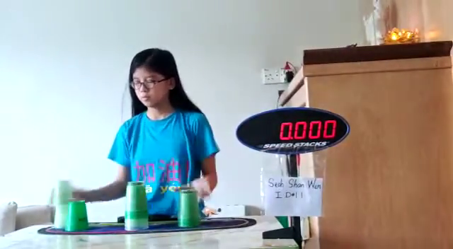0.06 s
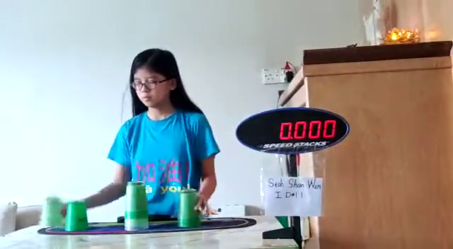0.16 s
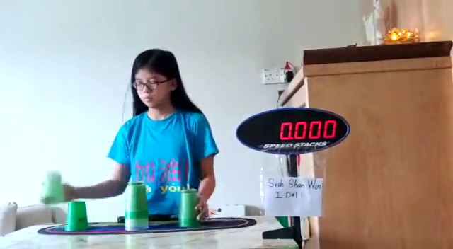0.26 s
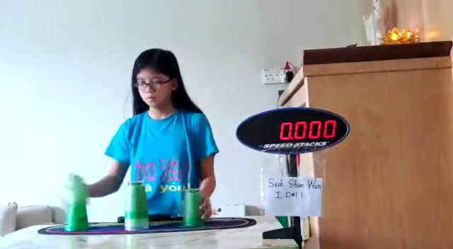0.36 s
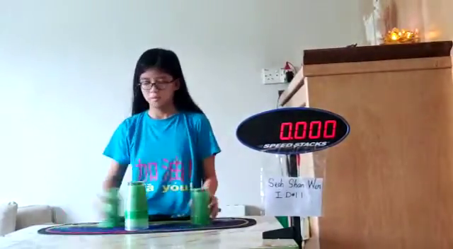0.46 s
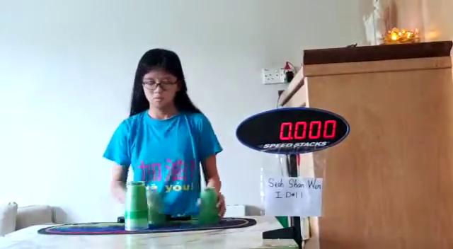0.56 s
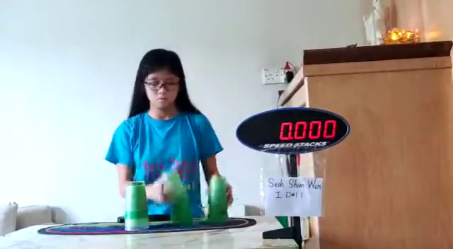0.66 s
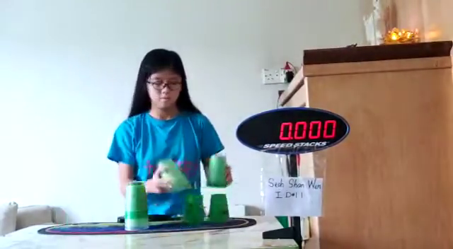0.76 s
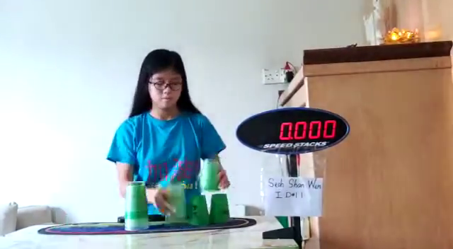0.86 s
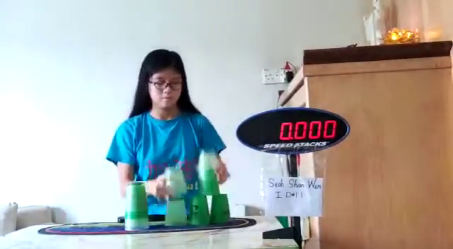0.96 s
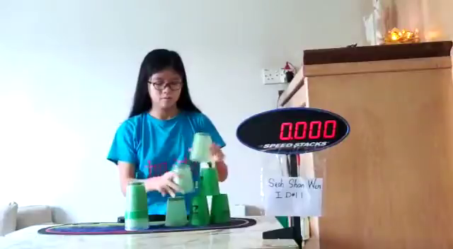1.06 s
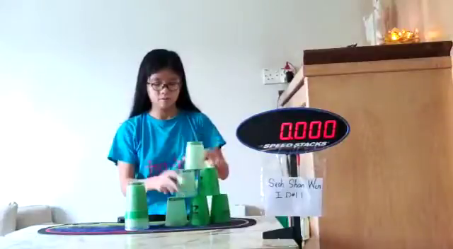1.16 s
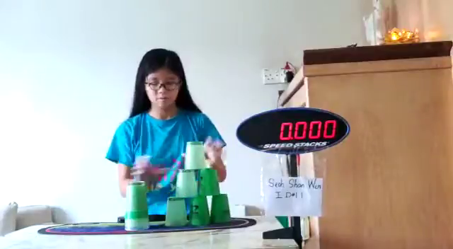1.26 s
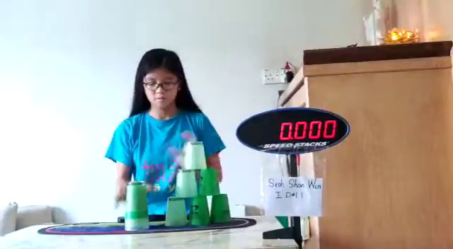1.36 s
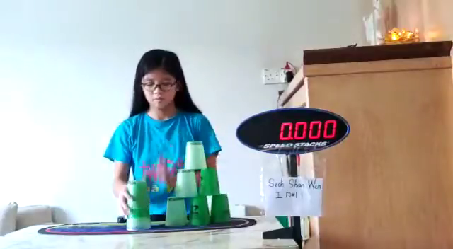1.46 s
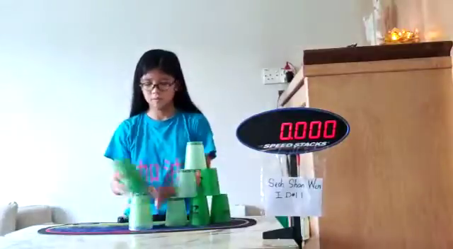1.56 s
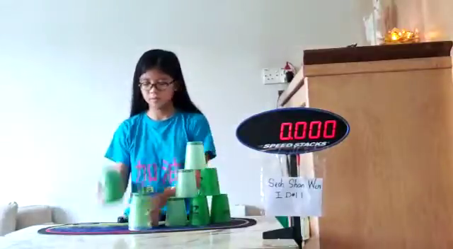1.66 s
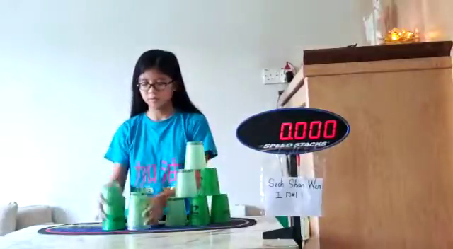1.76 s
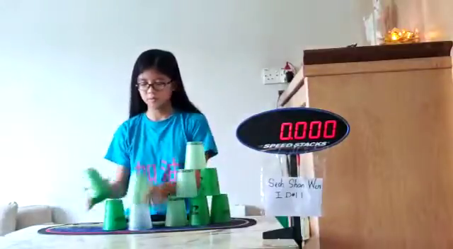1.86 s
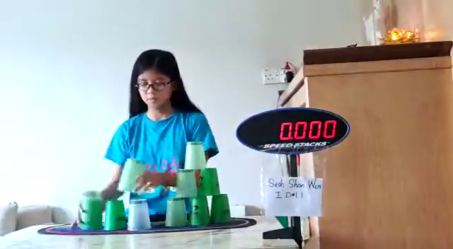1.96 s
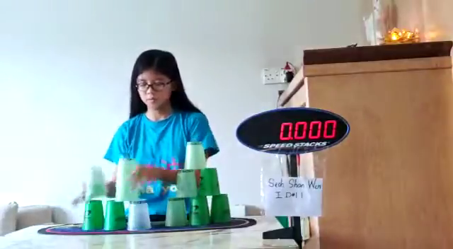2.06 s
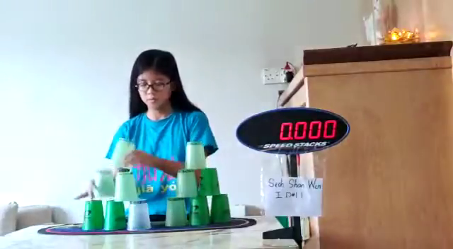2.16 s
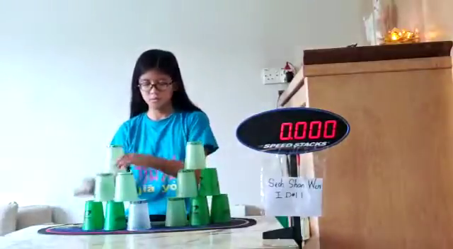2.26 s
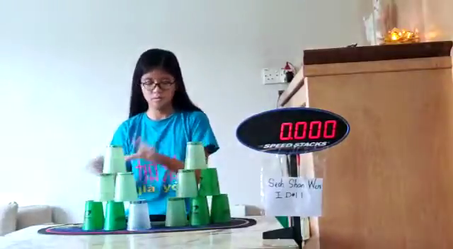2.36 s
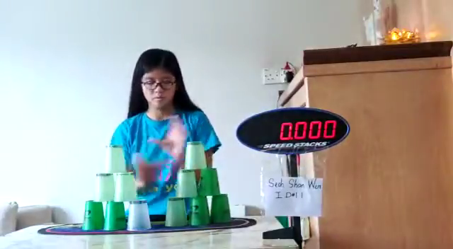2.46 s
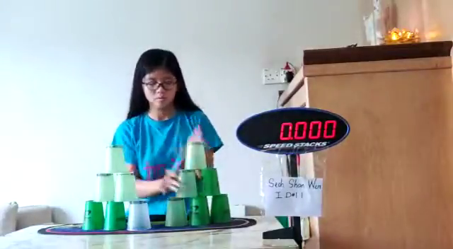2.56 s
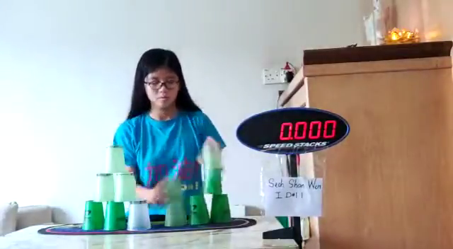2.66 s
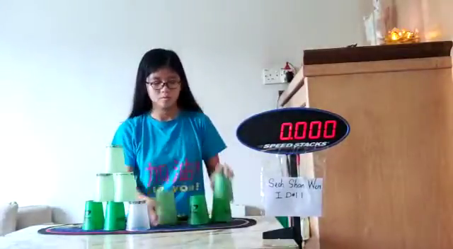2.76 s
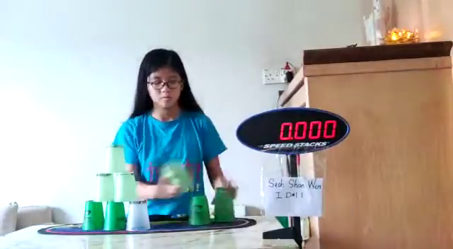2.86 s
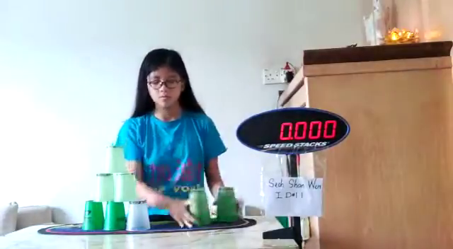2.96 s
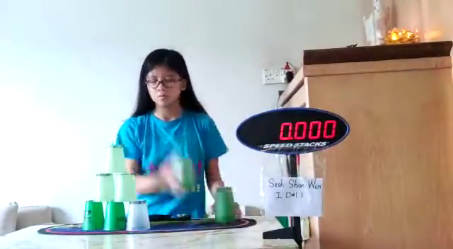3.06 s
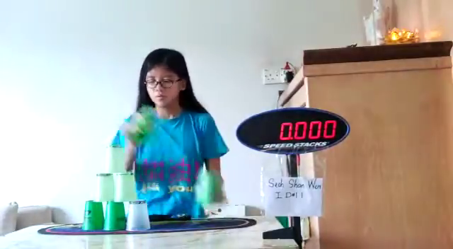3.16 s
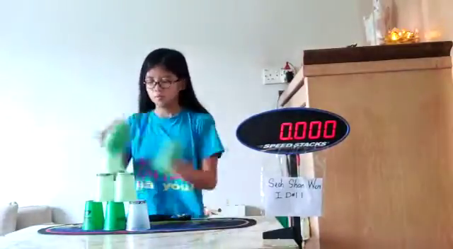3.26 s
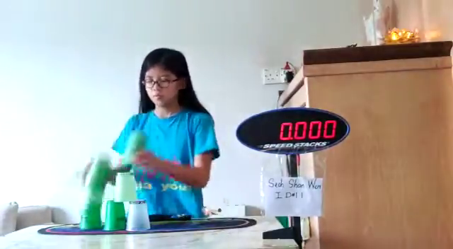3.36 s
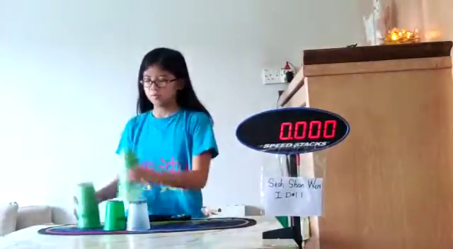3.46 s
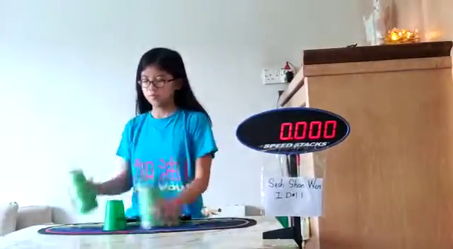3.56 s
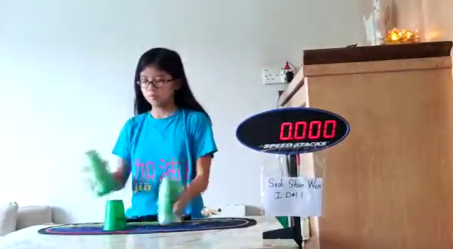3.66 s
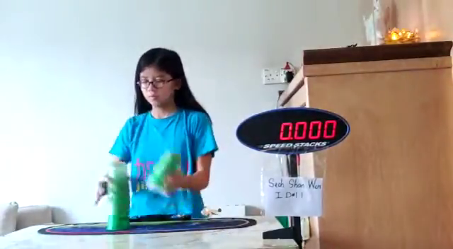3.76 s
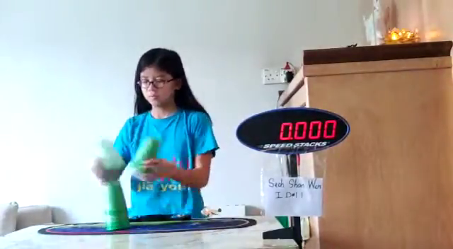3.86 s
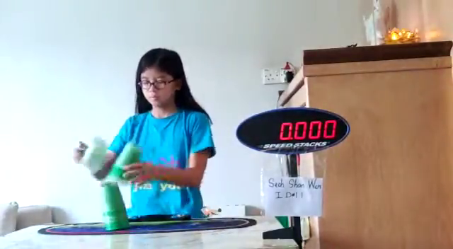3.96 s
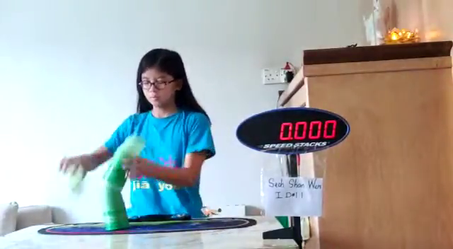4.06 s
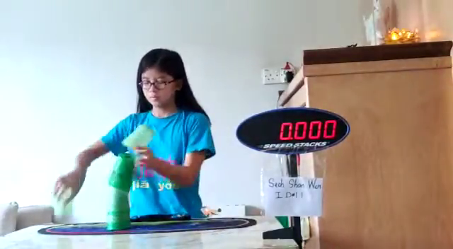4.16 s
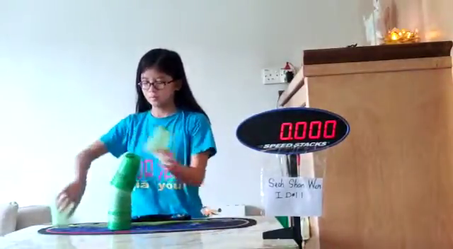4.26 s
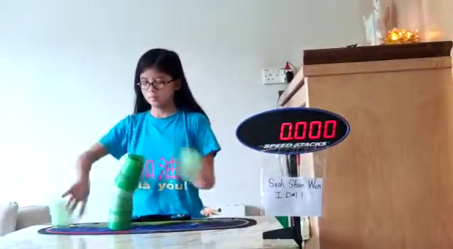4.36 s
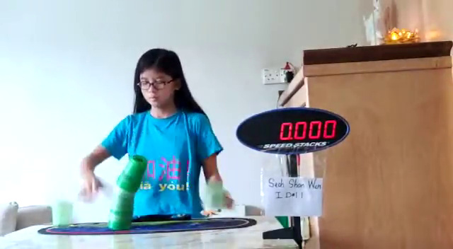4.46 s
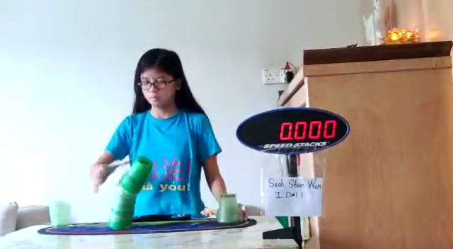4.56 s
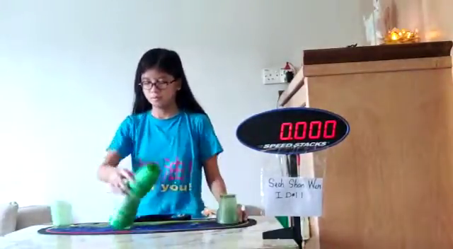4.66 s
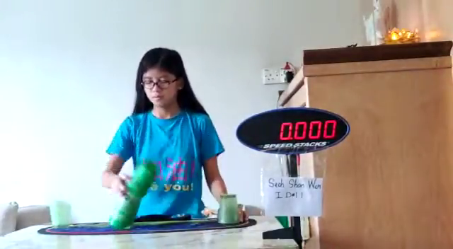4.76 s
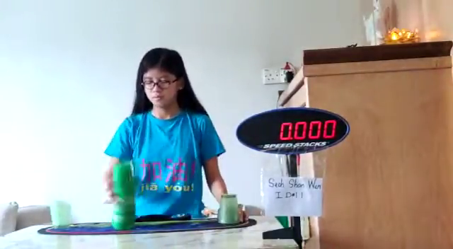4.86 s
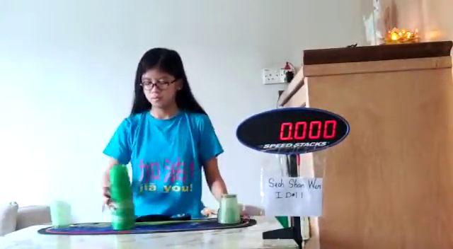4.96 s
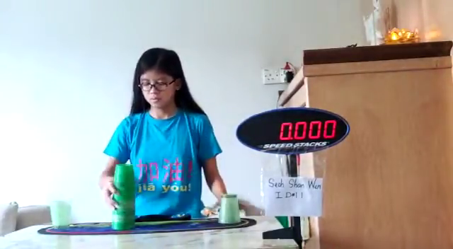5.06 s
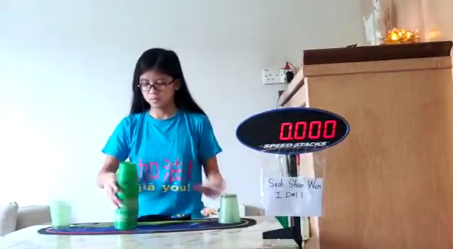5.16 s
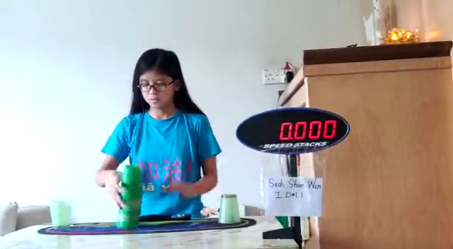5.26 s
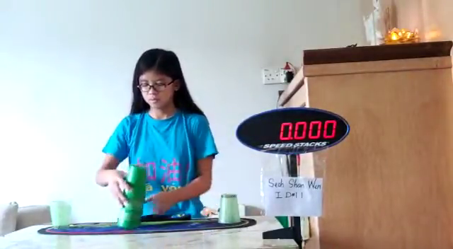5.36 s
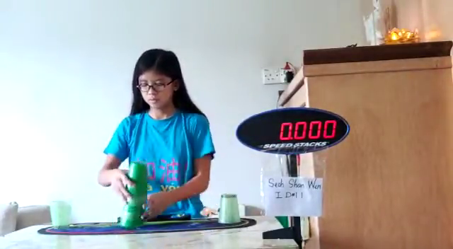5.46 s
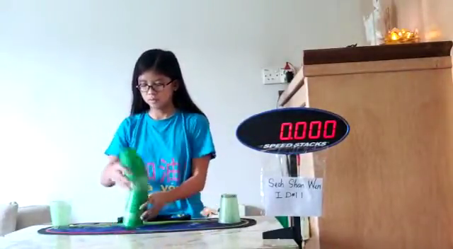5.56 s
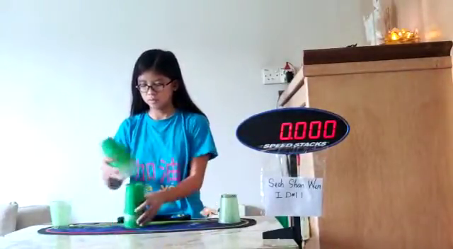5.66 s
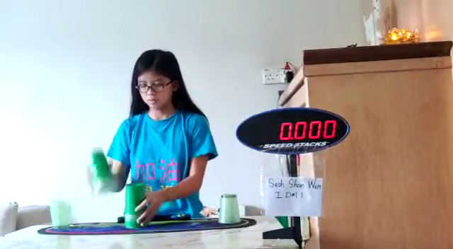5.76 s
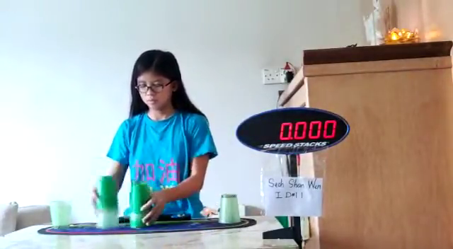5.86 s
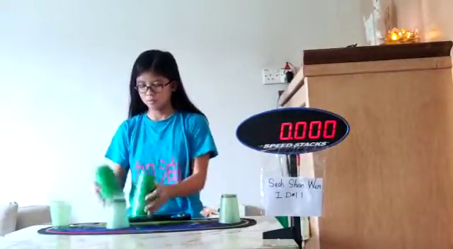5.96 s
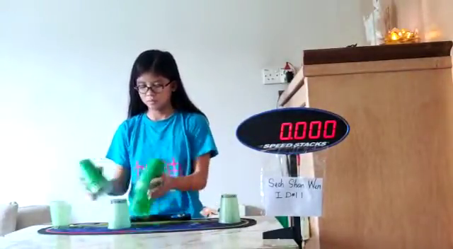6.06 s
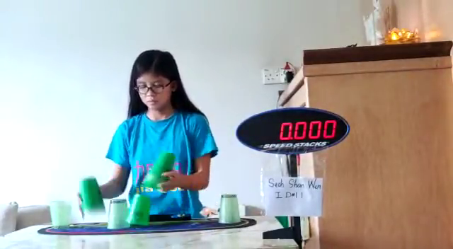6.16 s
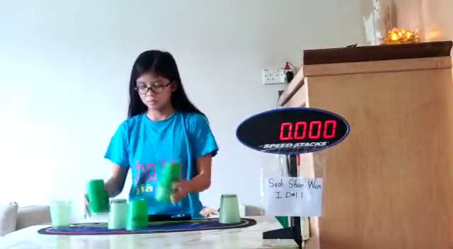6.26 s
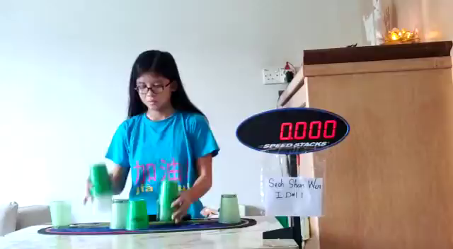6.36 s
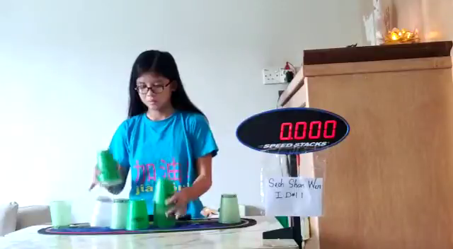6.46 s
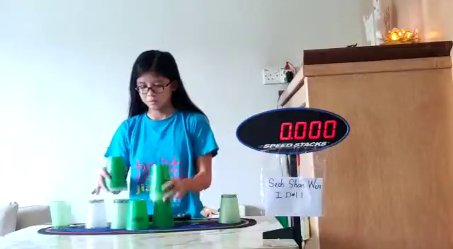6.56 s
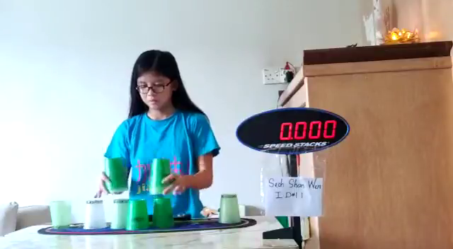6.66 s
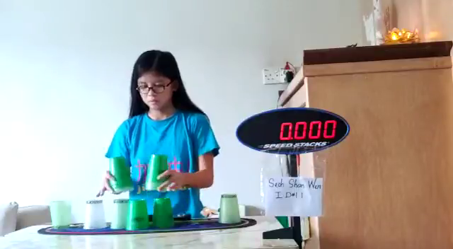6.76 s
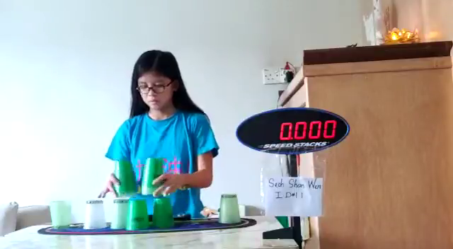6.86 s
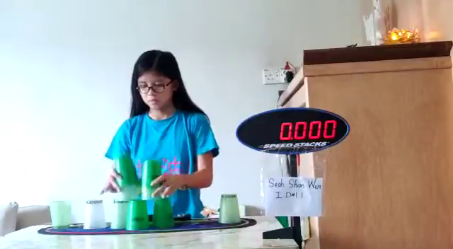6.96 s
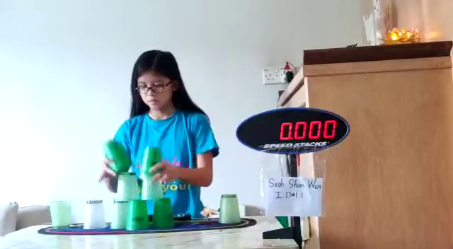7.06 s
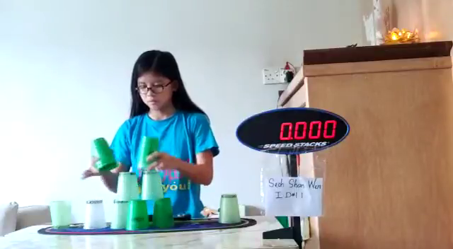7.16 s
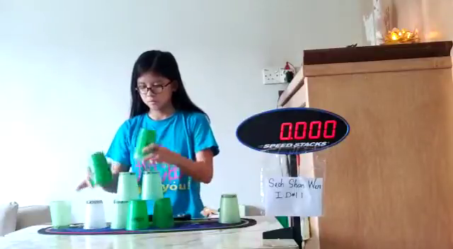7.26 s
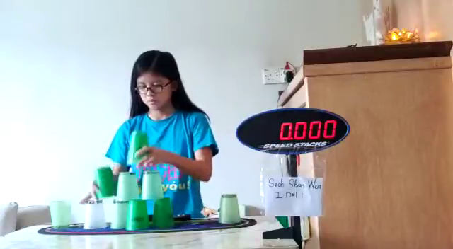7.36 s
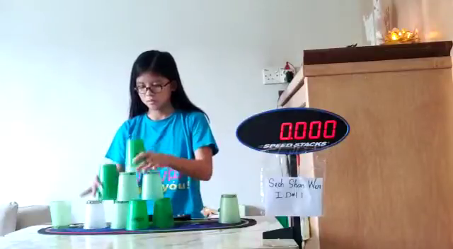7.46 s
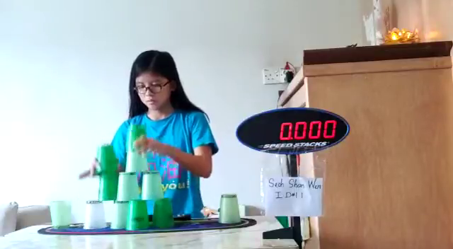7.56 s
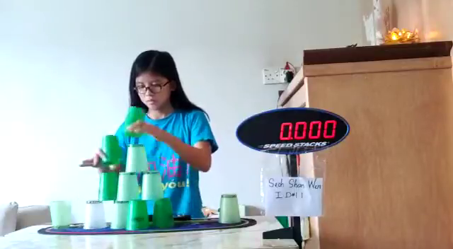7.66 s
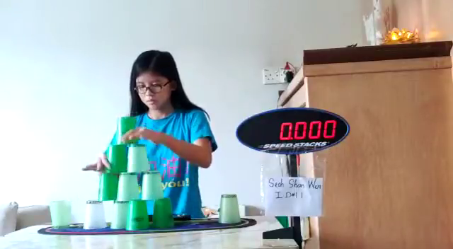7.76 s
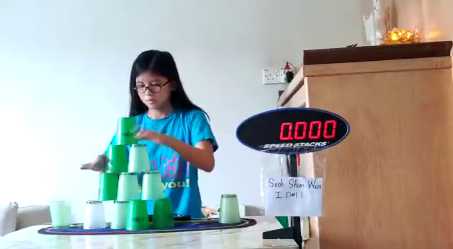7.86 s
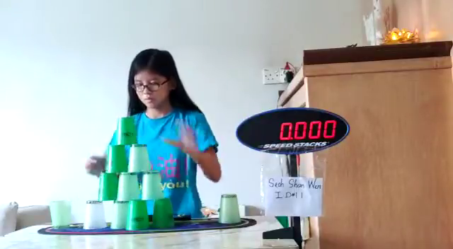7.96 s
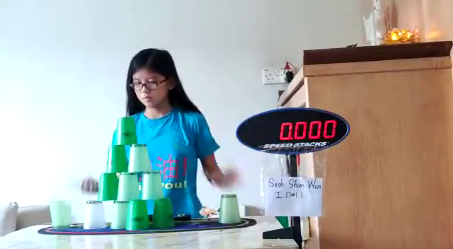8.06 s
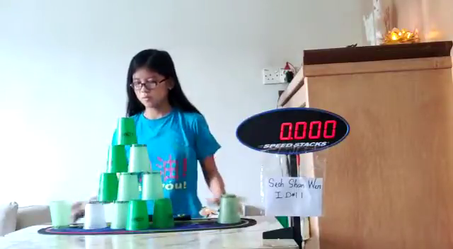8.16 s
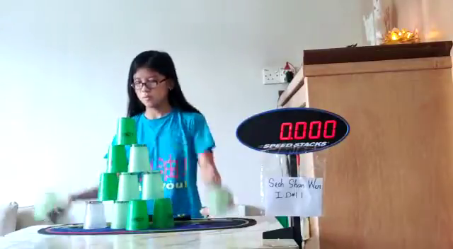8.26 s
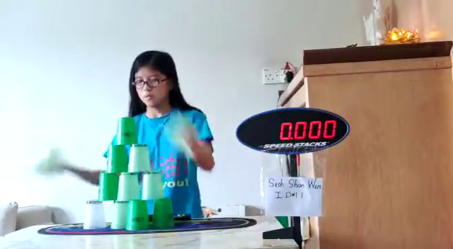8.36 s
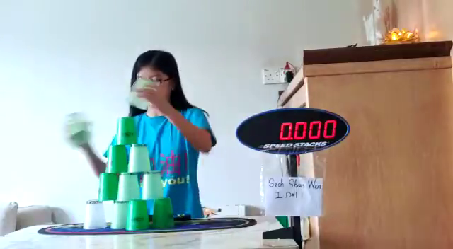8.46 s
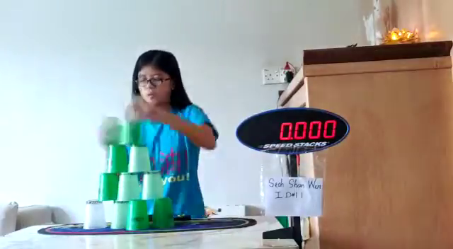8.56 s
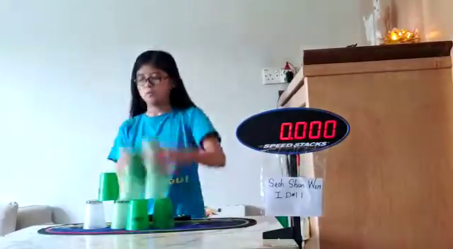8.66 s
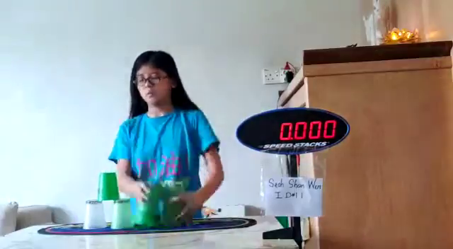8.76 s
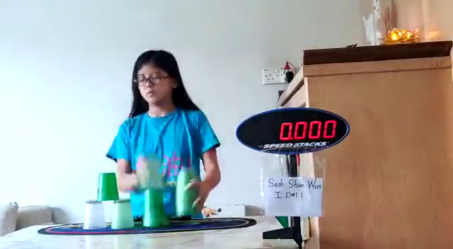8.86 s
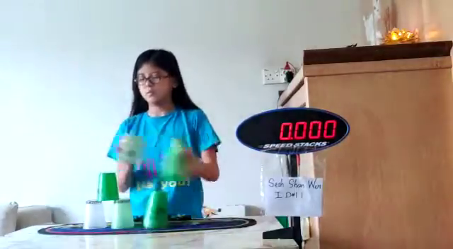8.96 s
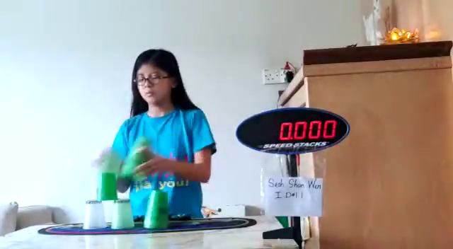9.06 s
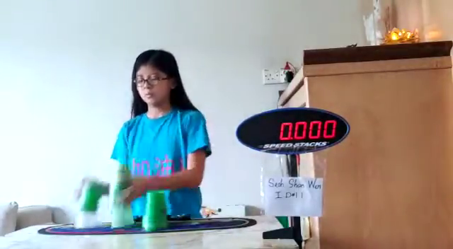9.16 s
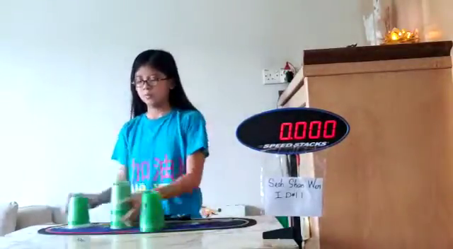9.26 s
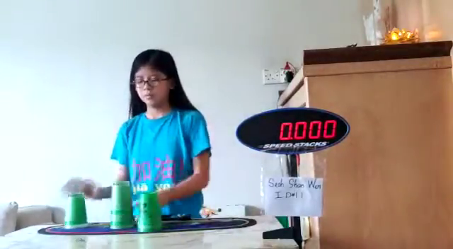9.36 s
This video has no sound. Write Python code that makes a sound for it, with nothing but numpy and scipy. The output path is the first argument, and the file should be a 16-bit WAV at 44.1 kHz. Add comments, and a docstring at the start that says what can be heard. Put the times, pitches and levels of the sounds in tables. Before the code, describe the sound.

Close by, plastic cups knock, pop and click as hands build pyramids and nest them again. Landings on the mat are dull and low, plastic on plastic is brighter and drier. A busy run of clacks comes first, then quieter handling with faint rubbing, more stacking, and a strong rasping collapse at the end. Short live room echo, dull murmur underneath, stereo pickup.

```python
"""Plastic cups are stacked into pyramids and swept down again on a mat on a table, in a small bare room.
Each landing is a set of filtered impulses: table thump, air resonance in the cup, wall modes and rim click.
Cups knocking into or against a stack add a dry crack; fine hisses are made of many tiny random slips.
A few faint squeaks are rising tones, dull bumps are bass resonances, and coloured noise is the room's murmur."""
import sys
import numpy as np
from scipy import signal
from scipy.fft import rfft, irfft
from scipy.io import wavfile
from scipy.ndimage import uniform_filter1d

SR = 44100
rng = np.random.default_rng(int(sys.argv[2]) if len(sys.argv) > 2 else 0)


def generate_wav(sig):
    """Save sig (samples, or channels by samples) to the path in sys.argv[1] as 16-bit PCM at SR."""
    pcm = np.round(np.clip(np.atleast_2d(sig).T, -1, 1) * 32767).astype(np.int16)
    wavfile.write(sys.argv[1], SR, pcm)


N = 415422  # samples in the scene

# Hissing sounds: cups sliding in or out of a stack, and two long, faint stretches of hiss.
# Each row: start in seconds, end in seconds, relative hiss level in dB.
HISSES = [(-.08, 0.11, -58.5), (0.166, 0.225, -53), (0.501, 0.576, -61), (0.74, 0.84, -64.5),
          (1.496, 1.588, -63.5), (1.658, 1.814, -69.5), (1.893, 2.08, -59.5), (2.404, 2.508, -60.5),
          (2.715, 2.821, -46.5), (2.832, 2.878, -41), (3.385, 3.53, -42.5), (3.781, 3.865, -55.5),
          (4.078, 4.184, -54), (4.262, 4.57, -63.5), (4.531, 5.025, -72), (5.397, 5.698, -68),
          (6.123, 6.232, -65), (6.337, 6.66, -77), (7.022, 7.081, -61), (7.14, 7.22, -65),
          (7.867, 7.899, -49), (8.249, 8.369, -70), (8.654, 8.833, -39.5), (9.17, 9.203, -45.5),
          (9.276, 9.34, -45)]
# Rims touching lightly. Each row: time in seconds, relative level in dB.
TOUCHES = [(0.1795, -27.5), (.491, -31.5), (0.649, -46), (1.017, -34.5), (1.5011, -33), (1.862, -31.5),
           (1.9716, -35.5), (2.6996, -39), (2.7813, -26), (3.3738, -32.5), (4.036, -27), (4.292, -43.5),
           (5.677, -47.5), (5.997, -33.5), (6.025, -42), (6.5923, -43)]
# Cups knocking into or against a stack. Each row: time in seconds, relative hollow pop level in dB,
# cup air pitch in Hz, relative knock level in dB, knock pitch in Hz, relative crack level in dB.
KNOCKS = [(.251, -15.5, 370, -38, 1920, -32.5), (2.142, -13.5, 603, -47, 1140, -42),
          (2.816, -10, 417, -37, 2060, -33.5), (2.944, -22.5, 413, -39, 1860, -42),
          (3.066, -9, 369, -32.5, 1880, -32.5), (3.519, -19, 740, -50, 1430, -29.5),
          (3.536, -12.5, 766, -32.5, 1370, -47), (3.672, -6.5, 399, -30.5, 1620, -27.5),
          (3.903, -11, 597, -29, 1530, -36), (4.044, -28.5, 510, -45, 1970, -50),
          (4.109, -27.5, 740, -48.5, 1484, -48.5), (5.004, -26.5, 575, -51.5, 1500, -58.5),
          (5.342, -33.5, 590, -55.5, 1510, -66.5), (5.378, -33.5, 575, -52, 1480, -54),
          (7.058, -23.5, 550, -54, 1730, -56), (8.729, -31, 503.6, -39.5, 1985, -34.5),
          (8.758, -19.5, 404, -36.5, 1950, -39), (8.8485, -8, 422, -26, 1525, -24),
          (9.32, -23, 497, -39.5, 1810, -42), (9.34, -13, 805, -43, 1290, -51)]
# Cups set down on the mat or on each other. Each row: time in seconds, relative hollow pop level in dB,
# cup air pitch in Hz, hardness from 0 (flat on the mat) to 1 (plastic on plastic).
LANDINGS = [(.475, -14, 572, .44), (.6, -20, 400, 0.52), (1.011, -9.5, 422, 0.7), (1.21, -22, 397, 0.82),
            (1.242, -13.5, 438, 0.79), (1.85, -18, 396.5, .17), (2.077, -12.5, 382, 0.55),
            (2.296, -11, 602, .61), (2.357, -15.5, 566, .77), (2.679, -26.5, 374, .56),
            (3.016, -6.5, 400, 0.68), (3.357, -27, 590, .88), (3.4, -25, 610, .88),
            (3.463, -21.5, 636, .77), (3.829, -21, 535, .54), (4.361, -35, 385, .34),
            (4.642, -23.5, 435, .18), (4.734, -35, 359, .26), (5.987, -14.5, 440, 0.17),
            (6.242, -23.5, 368, .1), (6.335, -18.5, 353, .06), (6.534, -25.5, 373, .4),
            (6.567, -21.5, 363, .32), (6.627, -26, 394, .09), (6.701, -31, 376, .05),
            (6.994, -17.5, 677, 0.68), (7.482, -22.5, 527, .66), (7.521, -10, 579, .72),
            (7.862, -12.5, 622, 0.84), (8.307, -36, 371, .25), (8.647, -15, 564, 0.77),
            (8.709, -19.5, 557, .97), (8.816, -5, 588, .7), (9.165, -24.5, 397, .82), (9.249, -6, 569, .66)]
# Runs of dull bumps as the hands shift a stack. Each row: start in seconds, end in seconds, level in dB.
BUMPS = [(1.935, 1.97, -40), (5.179, 5.4, -46.5), (5.453, 5.78, -50)]
# Faint squeaks of a stack turned in the hand. Each row: start in seconds, length in seconds, relative level in dB.
SQUEAKS = [(3.268, 0.11, -64), (4.43, 0.22, -79), (4.675, .19, -73.5)]

# Thin cup wall damped by the fingers. Each row: mode in Hz before detuning, relative gain in dB, width in Hz.
WALL_MODES = [(972, 16, 92), (1320, 2, 990), (1670, -16, 600), (1962, -8, 87), (2150, -21.5, 190),
              (3000, -8, 240)]
# Standing waves of the room. Each row: frequency in Hz, level over the direct sound in dB, width in Hz.
ROOM_MODES = [(119.4, 21.5, 7.3), (187.6, 22, 5.3), (242.6, 17.5, 4.4), (372.4, 17.5, 5.7),
              (408.3, 10.5, 6), (575, 13.5, 38), (726, 7, 44)]
# Echoes from table, wall and cabinet. Each row: mean delay in seconds, level against the direct sound in dB.
ECHOES = [(.0031, -2), (.0062, -10), (.0092, -18.5), (0.011, -2), (0.0134, -2.5), (0.016, -15.5),
          (.0222, -8), (0.0346, -9.5)]
# Reverberation time of the room. Each row: frequency in Hz, time to fall by 60 dB in seconds.
ROOM_T60 = [(100, 0.95), (260, 0.41), (700, 0.45), (1800, 0.45), (4800, 0.44), (7800, 0.39)]
# Strength of the diffuse tail. Each row: frequency in Hz, level over the direct sound in dB.
ROOM_TAIL = [(100, 8.5), (500, 13.5), (1000, 11), (2000, 10.5), (7000, 8.5)]
# Likeness of diffuse sound at the two microphones. Each row: frequency in Hz, left-right correlation.
ALIKE = [(100, 0.85), (300, .95), (550, 0.73), (900, 0.27), (1500, 0), (3000, 0.055), (8000, 0)]
# Stereo balance. Each row: frequency in Hz, left minus right in dB.
BALANCE = [(100, -0.5), (1200, -1.4), (2500, -0.5), (4500, 0.5), (6000, 4), (7000, 7), (7800, -1.5)]

# Spectrum of the table thump. Each row: frequency in Hz, relative gain in dB.
THUMP = [(25, -20.5), (50, -19.5), (85, -8), (120, -1.5), (200, 0), (300, -2), (450, -29.5), (900, -45.5),
         (2000, -94)]
# Spectrum of the hollow pop. Each row: frequency in Hz, relative gain in dB.
POP = [(60, -43.5), (200, -17.5), (350, 4.5), (550, 2.5), (750, 3.5), (900, -7.5), (1100, -15.5),
       (1400, -24.5), (2500, -42.5), (6000, -83)]
# Spectrum of the rim click. Each row: frequency in Hz, relative gain in dB.
RIM = [(300, -18), (1000, -6), (2000, -6.5), (2700, -6), (3300, -4), (3900, -5), (5000, -2), (6000, 0),
       (7000, 6.5), (7900, -5)]
# Spectrum of the hiss. Each row: frequency in Hz, relative gain in dB.
HISS = [(300, -21.5), (1000, -16.5), (2000, -10.5), (2800, -15), (3300, -11), (4000, -14), (5200, -9.5),
        (6200, -2), (7000, 2), (7900, -8.5)]
# Spectrum of the room murmur. Each row: frequency in Hz, relative gain in dB.
MURMUR = [(20, -12), (45, -26.5), (75, -4.5), (100, -11.5), (122, 4), (150, -5.5), (185, 4), (260, -2.5),
          (450, -7), (750, -6.5), (1000, -17), (1300, -28.5), (1900, -50), (2600, -59), (8000, -56.5)]

MURMUR_DB = -49  # RMS level against full scale
EDGE_HZ = 7980  # upper edge of the band
RING = 32768  # samples allotted to each sound
HZ, AGE = np.fft.rfftfreq(RING, 1 / SR), np.arange(RING) / SR  # frequency axis in Hz, time axis in s
FADE = np.minimum(10 * (1 - AGE / AGE[-1]), 1) ** 2  # every sound has died away by the end of its span

# How a landing divides its force: dB over the pop on the bare mat, dB added at hardness 1
THUMP_SOFT_DB, THUMP_HARD_DB = -5, -17
CLACK_SOFT_DB, CLACK_HARD_DB = -59, 49.1
CLICK_SOFT_DB, CLICK_HARD_DB = -48, 30.7
# The thump grows more slowly than the pop: dB lost for each dB of pop above a medium landing
MEDIUM_POP_DB, THUMP_LAG = -18, 0.22
WALL_HZ = 1170  # wall mode that a cup stirs when it lands on its rim
KNOCK_THUMP_DB, KNOCK_CLACK_DB, KNOCK_CLICK_DB = -10, 6, 1.5  # over the pop, the knock and the crack
KNOCK_WIDTH_HZ = 330
KNOCK_UPPER_HZ, GRIP_DETUNE = 3285, 0.042  # higher wall mode of a knock; largest share by which the grip shifts it
BUMP_GAP_S = .09
SQUEAK_HZ, SQUEAK_RISE_HZ_PER_S = 2310, 880  # the pitch climbs as the cups wedge tighter


def gain_of(db):
    """Level definition: 20 dB is a tenfold amplitude."""
    return 10 ** (np.asarray(db) / 20)


def rms(x):
    """Effective value: root of the mean square, kept above zero."""
    return np.sqrt(np.mean(x ** 2) + 1e-20)


def read(points, hz):
    """Linear interpolation on a logarithmic frequency axis."""
    f, value = np.transpose(points)
    return np.interp(np.log(hz + 1), np.log(f + 1), value)


def add(mix, s, sound):
    """Superposition: a stereo sound is summed into the mix from time s, cut off at both ends of the mix."""
    at = round(s * SR)
    part = mix[:, max(at, 0):][:, :RING + min(at, 0)]
    sound = sound[:, max(-at, 0):]
    part += sound[:, :part.shape[1]]


def colour(points):
    """Minimum phase: the Hilbert transform of the log gain supplies the phase of a causal filter."""
    log_gain = np.log(gain_of(read(points, HZ)))
    both_sides = np.r_[log_gain, log_gain[-2:0:-1]]
    return np.exp(np.conj(signal.hilbert(both_sides)))[:len(HZ)]


def resonance(hz, width_hz):
    """Damped oscillator: a band-pass of gain 1 at its centre."""
    damping = 1j * HZ * width_hz
    return damping / (hz ** 2 - HZ ** 2 + damping)


def stereo_noise(size):
    """Spatial coherence: short-time spectra of diffuse sound, most alike at two close microphones in the bass."""
    hz, t, (mid, side) = signal.stft(rng.standard_normal((2, size)), SR, nperseg=1024)
    alike = np.clip(read(ALIKE, hz), -1, 1)[:, None]
    mid = mid * np.sqrt((1 + alike) / 2)
    side = side * np.sqrt((1 - alike) / 2)
    return hz[:, None], t, np.array([mid + side, mid - side])


def murmur(patchy_db=2.5):
    """Coloured noise: low background sound of the room, slightly lumpy in time and frequency."""
    hz, t, z = stereo_noise(N)
    patches = rng.standard_normal(z.shape[1:])
    patches = uniform_filter1d(patches, size=4, axis=0)  # across frequency
    patches = uniform_filter1d(patches, size=7, axis=1)  # across time
    lumpy = z * gain_of(patchy_db * patches / rms(patches))
    noise = signal.istft(lumpy, nperseg=1024)[1][:, :N]
    noise = irfft(rfft(noise) * gain_of(read(MURMUR, np.fft.rfftfreq(N, 1 / SR))), N)
    return gain_of(MURMUR_DB) * noise / rms(noise)


def echoes(wander_s=.0006, port_lag_s=.00007):
    """Specular reflection: direct sound and near echoes, each with its own side, shifting as the cups move about."""
    taps = np.zeros((2, RING))
    taps[[0, 1], [0, 2]] = 1  # the direct sound reaches the left microphone just first
    for delay, db in ECHOES:
        side_lag = np.array([1, -1]) * port_lag_s * rng.standard_normal()
        at = delay + wander_s * rng.uniform(-1, 1) + side_lag
        taps[[0, 1], np.round(abs(at) * SR).astype(int)] += gain_of(db)
    return rfft(taps)


def room(build_s=.005):
    """Room transfer function: near echoes, exponentially decaying diffuse tail and standing waves."""
    hz, t, z = stereo_noise(RING)
    t60 = read(ROOM_T60, hz)
    unit_energy = np.sqrt(np.log(1e6) / (t60 * SR))
    decay = 1e-3 ** (t / t60)
    z = z * gain_of(read(ROOM_TAIL, hz)) * unit_energy * decay
    tail = signal.istft(z, nperseg=1024)[1][:, :RING]
    tail = tail * (1 - np.exp(-(AGE / build_s) ** 2))  # the tail builds up gradually
    standing = sum(gain_of(db) * resonance(f, width) for f, db, width in ROOM_MODES)
    balance = gain_of(np.outer([.5, -.5], read(BALANCE, HZ)))
    return (echoes() + rfft(tail) + standing) * balance


def heard(spectrum, space, db, span_s=0.024):
    """Convolution: a source passes through the room, scaled to RMS level db over its first span_s."""
    sound = irfft(spectrum * space) * FADE
    return gain_of(db) * sound / rms(sound[:, :round(span_s * SR)])


def hisses(slips_per_s=2700.0, grain_db=7.0, level_db=2.0, hollow_db=4.5, hollow_hz=770.0, hollow_width_hz=640.0):
    """Granular noise, as in dry friction: each hiss is a swell of tiny random slips of uneven size."""
    out, hiss = np.zeros((2, N)), colour(HISS)
    for start, end, db in HISSES:
        length = end - start
        stroke = np.sqrt(abs(np.sin(np.pi * np.minimum(AGE / length, 1))))  # swells, then fades
        sizes = gain_of(grain_db * np.minimum(rng.exponential(1, RING), 4)) * rng.standard_normal(RING)
        slips = sizes * (rng.random(RING) < slips_per_s / SR)
        rub, space = rfft(slips * stroke), room()
        hollow = resonance(hollow_hz, hollow_width_hz) ** 3  # a hollow band beneath the hiss
        add(out, start, heard(hiss * rub, space, db + level_db, length))
        add(out, start, heard(hollow * rub, space, db + hollow_db, length))
    return out


def contact(db, scuff_db=-0.5, scuff_s=0.0052, cleaner=0.72, grain_db=6.0):
    """Impulsive excitation: a light contact scuffs and chatters; a harder blow is more nearly one clean crack."""
    slips = rng.standard_normal(RING) * gain_of(grain_db * np.minimum(rng.exponential(1, RING), 4))
    scuff = slips * np.exp(-AGE / scuff_s)
    force_db = max(db + 38, 0)
    return 1 + gain_of(scuff_db - cleaner * force_db) * rfft(scuff / np.linalg.norm(scuff))


def wall(struck_hz, struck_db=13.0, struck_width_hz=160.0, spread=0.045):
    """Modal superposition: bending modes detuned by the grip, plus one the point of contact brings out."""
    tune = 1 + spread * rng.uniform(-1.3, 1)
    modes = sum(gain_of(db) * resonance(hz * tune, width) for hz, db, width in WALL_MODES)
    struck = gain_of(struck_db) * resonance(struck_hz, struck_width_hz)
    radiation = resonance(1500, 1700)  # a small cup radiates little bass
    return (modes + struck) * radiation


def touches(click_db=-12.5, clack_db=-29.0, wall_hz=2000.0):
    """Light impact: cups graze each other in the air, so only rim and wall sound."""
    out, rim = np.zeros((2, N)), colour(RIM)
    for s, click in TOUCHES:
        space, graze = room(), contact(click + click_db)
        add(out, s, heard(rim * graze, space, click + click_db))
        add(out, s, heard(wall(wall_hz) * graze, space, click + clack_db))
    return out


def knocks(ring_db=-8.5, crack_db=-2.75, knock_direct_db=7.0, upper_db=-15.0, scuff_db=-3.5, scuff_s=0.0028):
    """Damped impact: cups give a dry crack and a short knock of the wall, with extra direct sound."""
    out, rim = np.zeros((2, N)), colour(RIM)
    for s, _, _, ring, ring_hz, crack in KNOCKS:
        space = room()
        knock = resonance(ring_hz, KNOCK_WIDTH_HZ) ** 2
        upper_hz = KNOCK_UPPER_HZ * (1 + GRIP_DETUNE * rng.uniform(-1, 1))
        upper = resonance(upper_hz, KNOCK_WIDTH_HZ) ** 2
        scuff = rng.standard_normal(RING) * np.exp(-AGE / scuff_s)
        blow = 1 + gain_of(scuff_db) * rfft(scuff / np.linalg.norm(scuff))
        # the gains added to the room strengthen the direct sound
        add(out, s, heard(knock * blow, space + gain_of(knock_direct_db), ring + ring_db))
        add(out, s, heard(rim * blow, space + 1, crack + crack_db))
        add(out, s, heard(upper * blow, space, crack + upper_db))
    return out


def cushion(hardness_db, corner_hz=1747.0, db_per_octave=33.5):
    """Contact time: the softer the landing, the longer the contact and the lower its second-order cut-off."""
    ratio = HZ / (corner_hz * 2 ** (hardness_db / db_per_octave))
    return 1 / (1 - ratio ** 2 + 1j * np.sqrt(2) * ratio)


def cup_air(hz, air_db=3.5, width_hz=38.0, overtone=2.103, overtone_db=-7.5, overtone_width_hz=57.0):
    """Cavity resonance: the air in a cup rings at its pitch and at one overtone, beside the plain pop."""
    fundamental = gain_of(air_db) * resonance(hz, width_hz)
    return 1 + fundamental + gain_of(overtone_db) * resonance(hz * overtone, overtone_width_hz)


def settle(rise_s=0.006):
    """Settling: the cup's rim rocks for a few milliseconds after it lands, a dense burst of noise that swells
    and dies."""
    swell = rng.standard_normal(RING) * AGE * np.exp(-AGE / rise_s)
    return rfft(swell / np.linalg.norm(swell))


def blows():
    """Division of force: yields s, pop dB, air Hz, thump dB, clack dB, wall Hz and click dB of every blow."""
    for s, pop, air_hz, hardness in LANDINGS:  # the mat favours the thump, plastic the clack
        thump = pop + THUMP_SOFT_DB + THUMP_HARD_DB * hardness - THUMP_LAG * (pop - MEDIUM_POP_DB)
        clack = pop + CLACK_SOFT_DB + CLACK_HARD_DB * hardness
        click = pop + CLICK_SOFT_DB + CLICK_HARD_DB * hardness
        yield s, pop, air_hz, thump, clack, WALL_HZ, click
    for s, pop, air_hz, knock, knock_hz, crack in KNOCKS:
        yield s, pop, air_hz, pop + KNOCK_THUMP_DB, knock + KNOCK_CLACK_DB, knock_hz, crack + KNOCK_CLICK_DB


def landings(pop_db=-11.0, thump_db=-6.0, clack_db=-6.0, click_db=-2.0, settle_db=6.0, give_s=.0012):
    """Cushioned impact: each landing or knock gives a thump and a hollow pop; wall and rim add the clack."""
    out, thump, pop, rim = np.zeros((2, N)), colour(THUMP), colour(POP), colour(RIM)
    for s, hollow, air_hz, table, clack, wall_hz, click in blows():
        space = room()
        with_settling = space + gain_of(settle_db) * settle()  # the rim rocks for some milliseconds as it settles
        air = pop * cushion(clack - hollow) * cup_air(air_hz)
        # thump and pop come slightly after wall and rim
        add(out, s + give_s, heard(air, with_settling, hollow + pop_db))
        add(out, s + give_s, heard(thump, space, table + thump_db))
        add(out, s, heard(wall(wall_hz) * contact(clack), space, clack + clack_db))
        add(out, s, heard(rim * contact(click), space, click + click_db))
    return out


def bumps(hz=113.0, width_hz=64.0):
    """Low-frequency resonance: soft, short pushes with nothing but bass, sounded without the room."""
    out = np.zeros((2, N))
    for start, end, db in BUMPS:
        for s in np.arange(start, end, BUMP_GAP_S):
            dull = resonance(hz * rng.uniform(1.0, 1.4), width_hz) ** 4
            add(out, s, heard(dull, np.ones((2, 1)), db))
    return out


def squeak(jitter=0.011, level_db=2.0):
    """Stick and slip: two cups make a thin, unsteady tone that swells, fades and rises in pitch."""
    out = np.zeros((2, N))
    for start, length, db in SQUEAKS:
        waver = uniform_filter1d(rng.standard_normal(RING), size=200)
        pitch_hz = (SQUEAK_HZ + SQUEAK_RISE_HZ_PER_S * AGE) * (1 + jitter * waver / rms(waver))
        turns = np.cumsum(pitch_hz) / SR
        swell = np.sin(np.pi * np.minimum(AGE / length, 1))
        tone = gain_of(db + level_db) * swell * np.sin(2 * np.pi * turns)
        sound = irfft(rfft(tone) * room())
        add(out, start, sound * rms(tone) / rms(sound))  # the room leaves the level unchanged
    return out


def scene():
    """Superposition: all the cup sounds over the room's murmur."""
    return landings() + knocks() + touches() + hisses() + bumps() + squeak() + murmur()


def record(dry):
    """Band limitation: a linear-phase low-pass with a steep upper edge."""
    low_pass = signal.firwin(131, EDGE_HZ, window=("kaiser", 6), fs=SR)
    return signal.oaconvolve(dry, low_pass[None], "same")


dry = scene()
out = record(dry)
generate_wav(out)
```